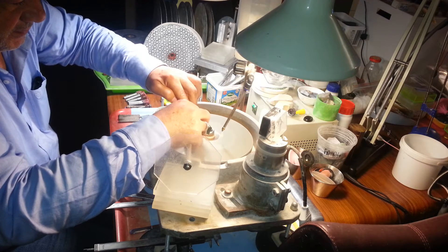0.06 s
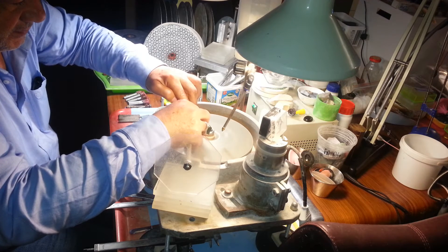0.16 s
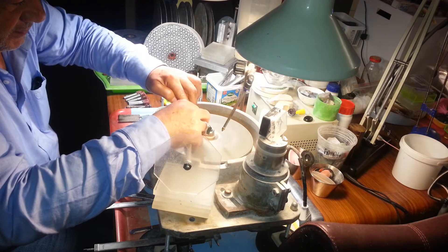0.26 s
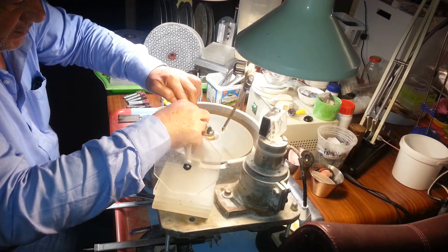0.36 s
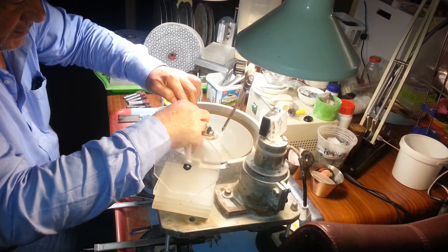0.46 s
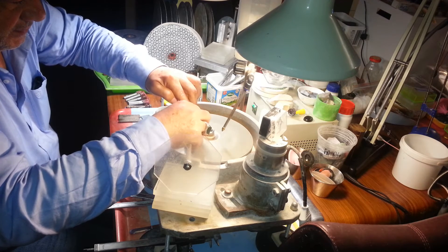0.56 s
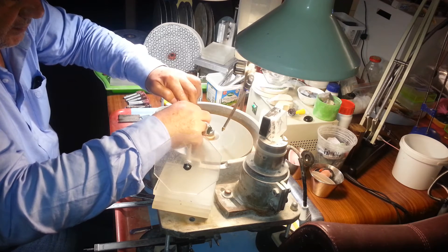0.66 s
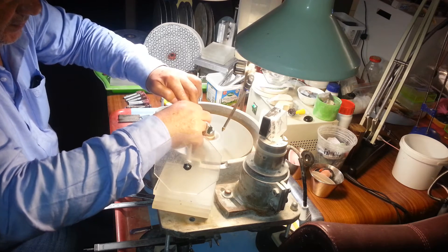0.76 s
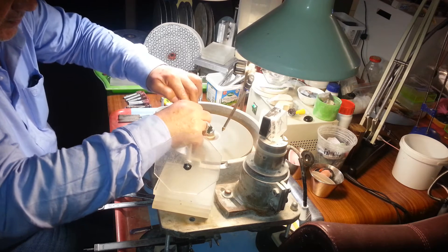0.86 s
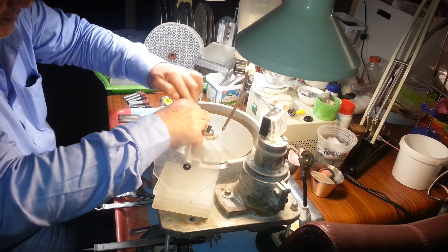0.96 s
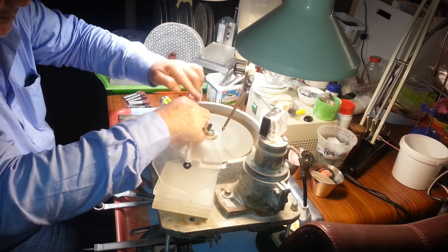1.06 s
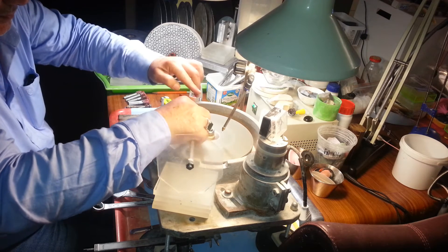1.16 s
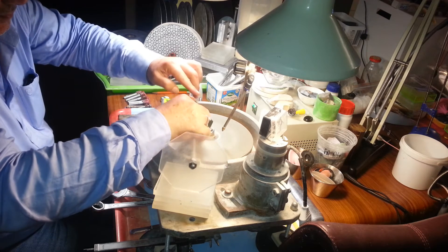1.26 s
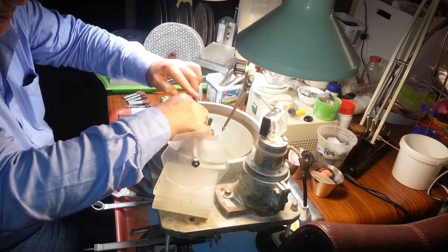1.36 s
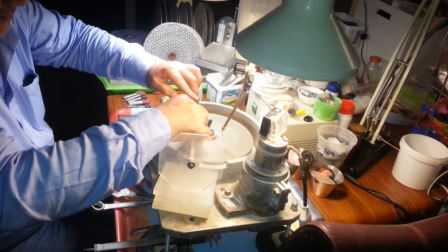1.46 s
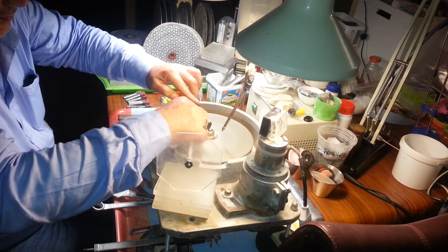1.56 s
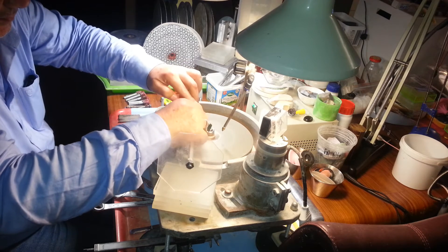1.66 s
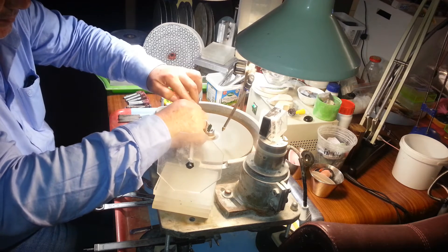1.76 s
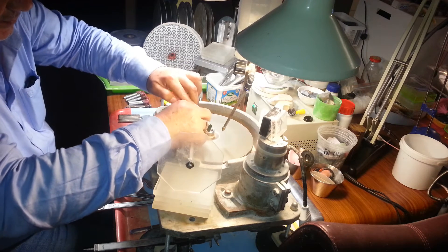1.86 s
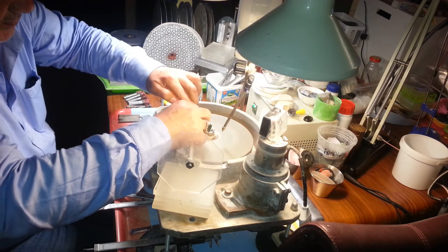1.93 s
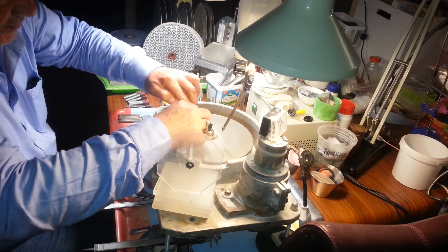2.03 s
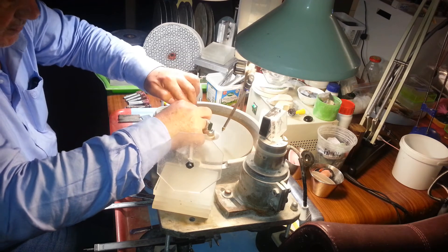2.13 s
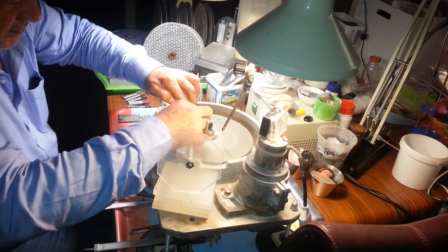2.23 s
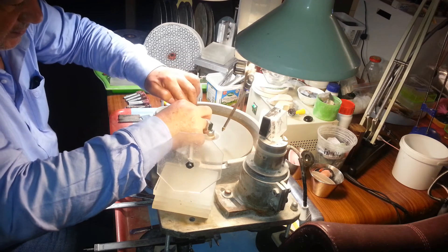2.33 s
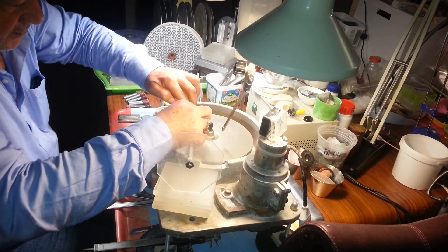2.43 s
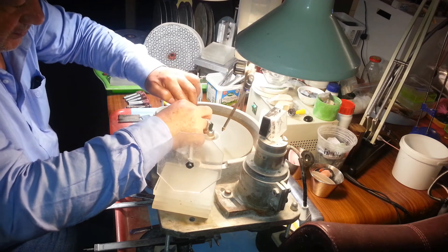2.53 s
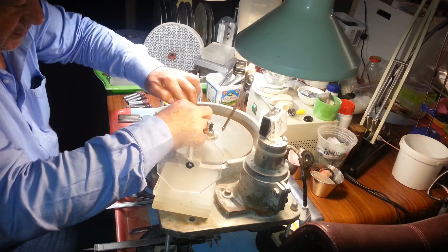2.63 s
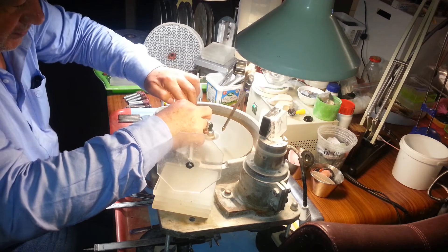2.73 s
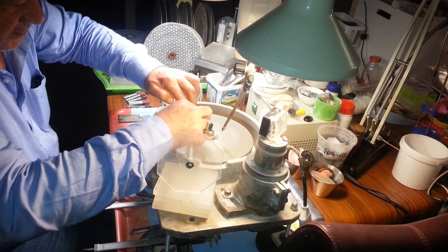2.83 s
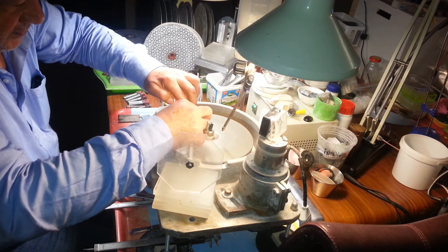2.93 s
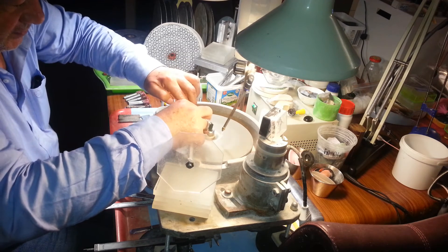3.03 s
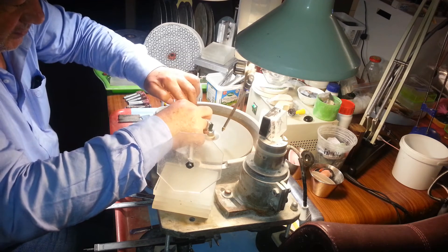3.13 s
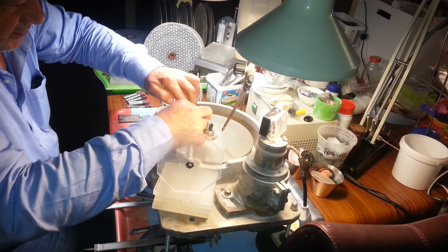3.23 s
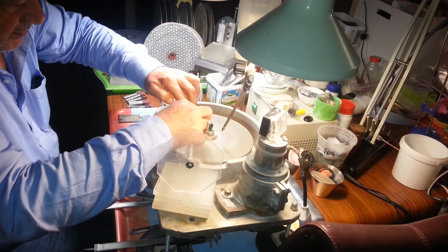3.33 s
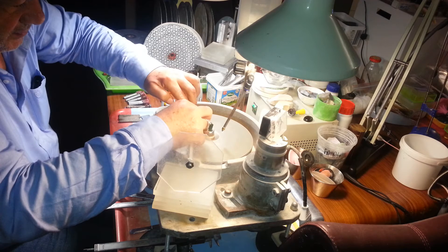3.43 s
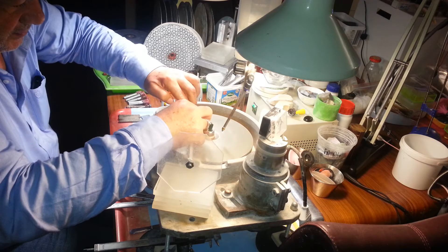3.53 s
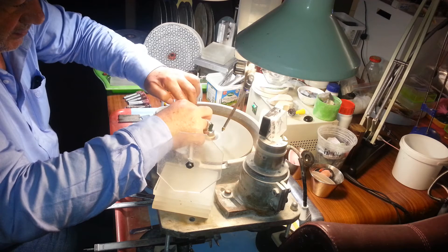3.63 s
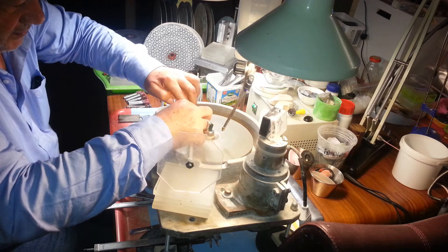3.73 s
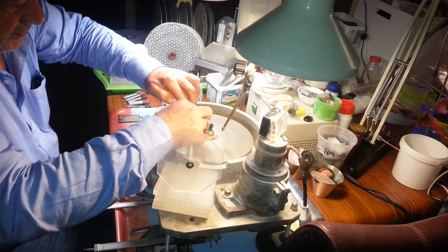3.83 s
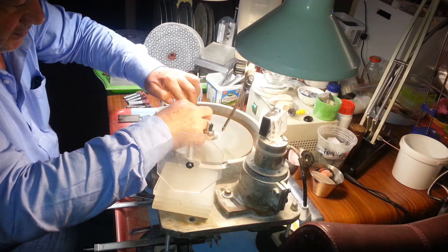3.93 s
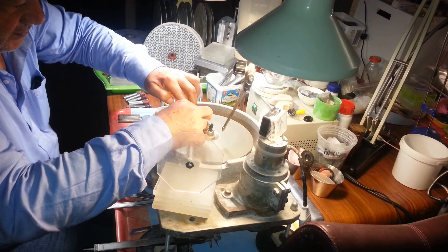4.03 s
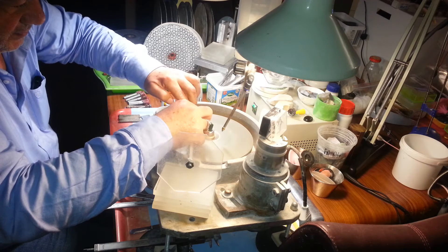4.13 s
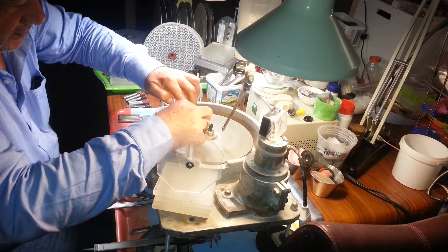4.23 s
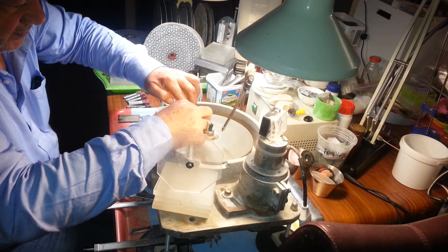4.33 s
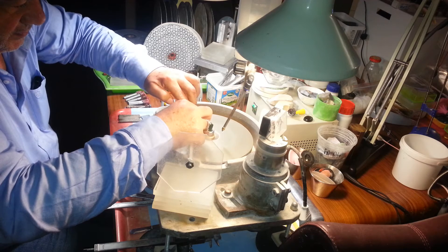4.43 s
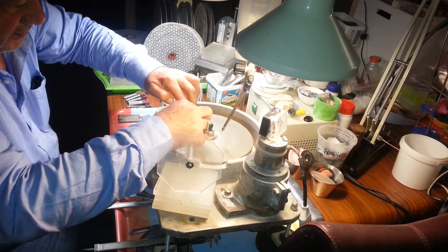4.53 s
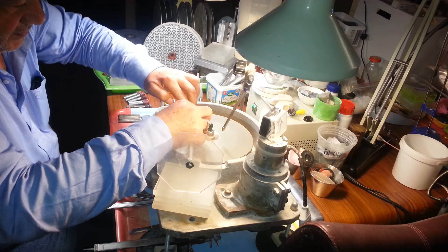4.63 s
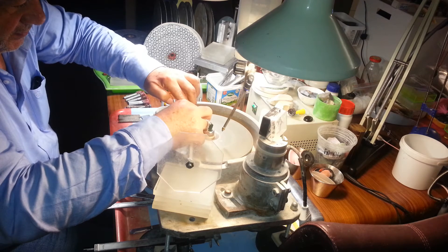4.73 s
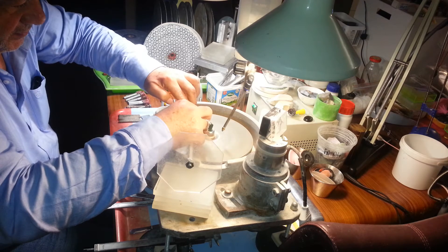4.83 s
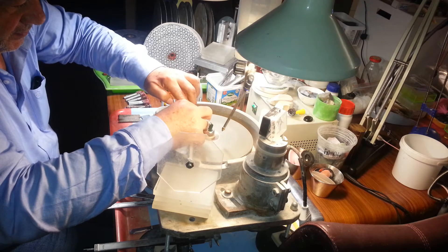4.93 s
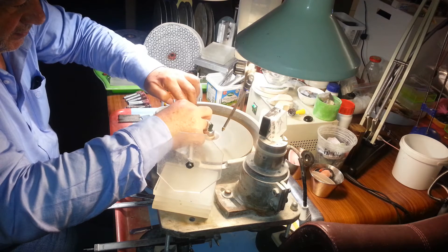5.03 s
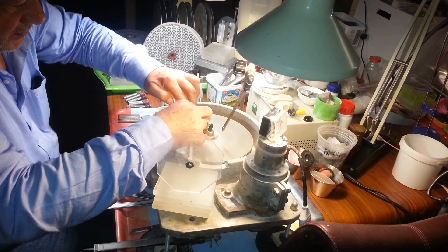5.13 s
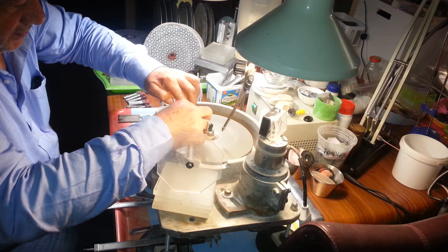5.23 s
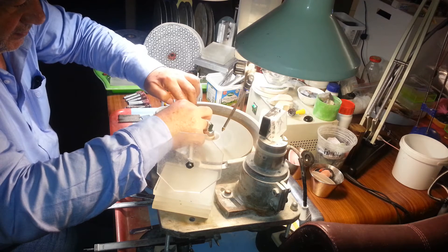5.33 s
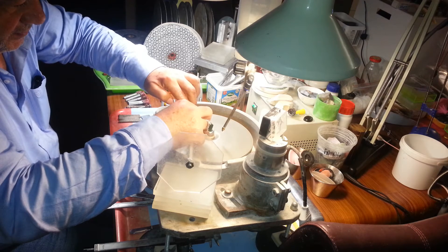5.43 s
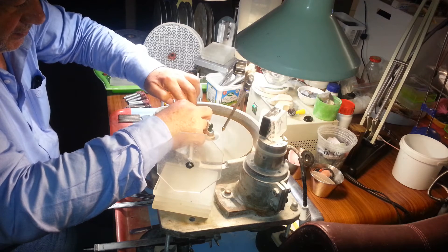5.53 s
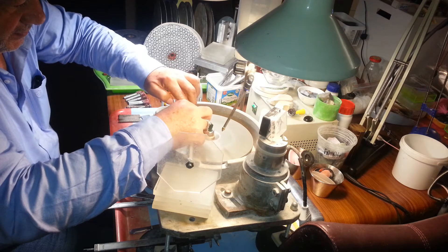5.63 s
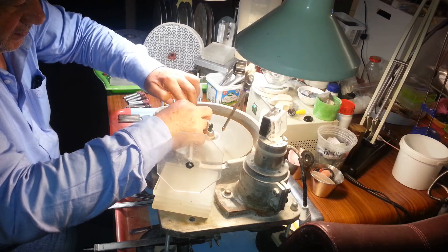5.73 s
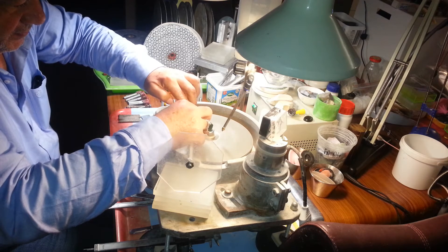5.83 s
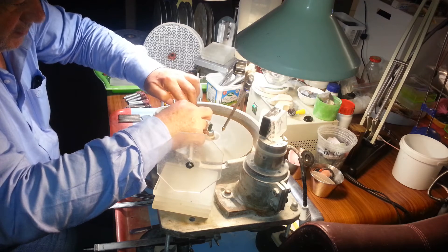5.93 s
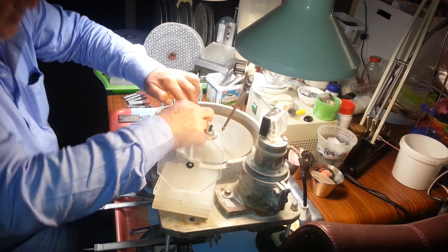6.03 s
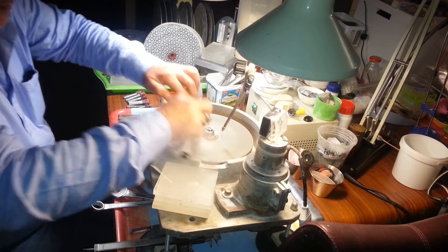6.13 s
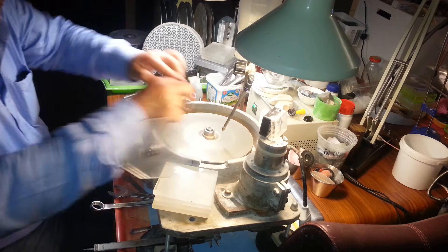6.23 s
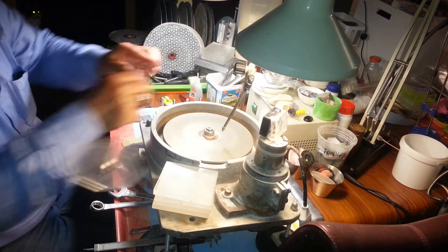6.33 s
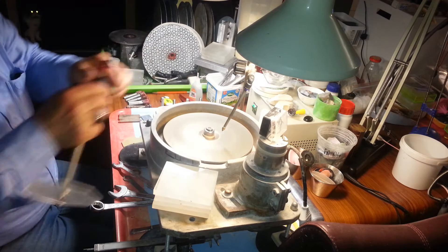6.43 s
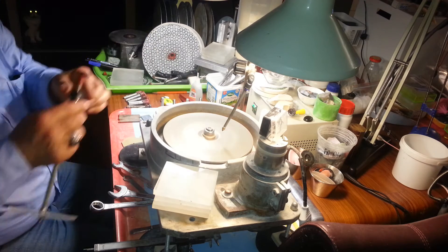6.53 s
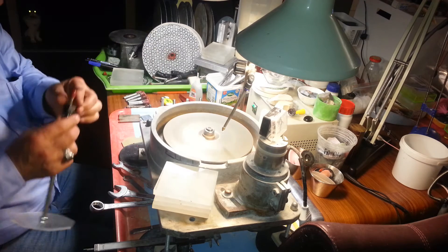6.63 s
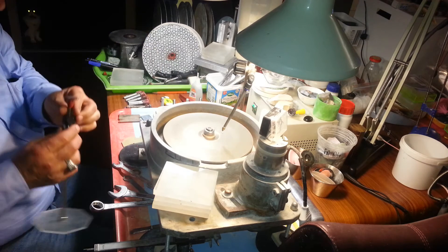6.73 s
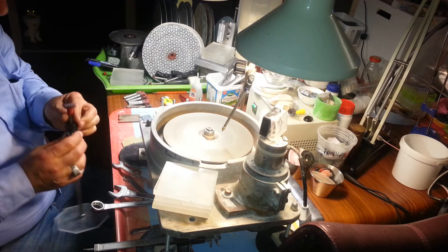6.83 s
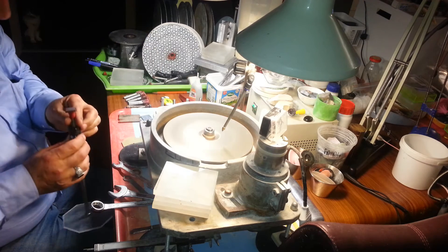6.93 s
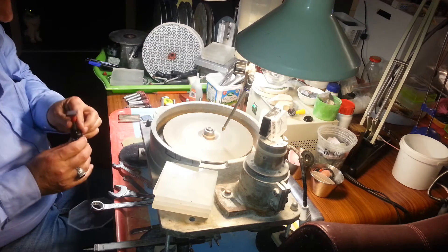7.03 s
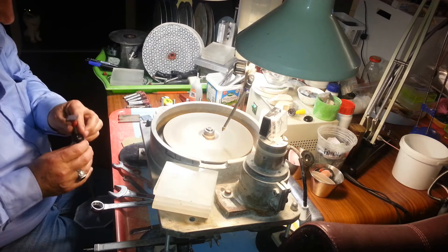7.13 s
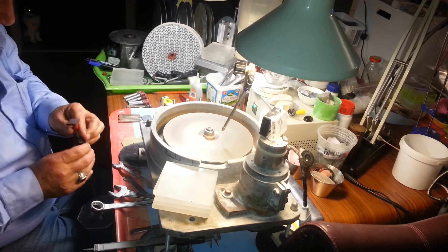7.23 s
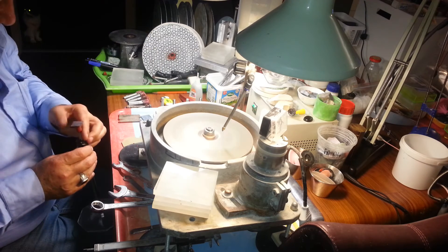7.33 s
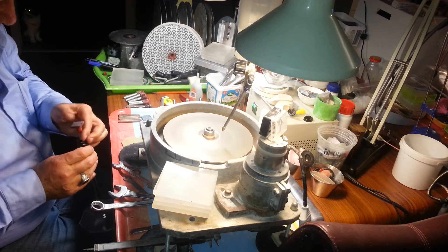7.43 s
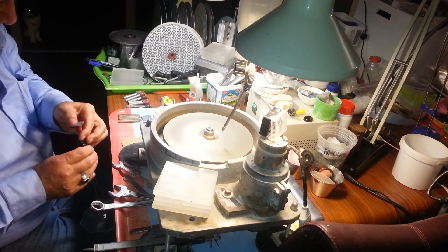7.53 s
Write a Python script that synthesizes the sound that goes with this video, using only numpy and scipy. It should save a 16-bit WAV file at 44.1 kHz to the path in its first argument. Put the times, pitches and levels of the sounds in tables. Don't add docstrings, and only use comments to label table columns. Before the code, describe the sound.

Sizzling, gritty treble dominates as a stone rubs on a spinning disc, with a low motor buzz pulsing beneath. A brief gap exposes hum and one clattering tap, then contact returns with a chirping scrape and continues for about four seconds. A final hard catch lifts the stone away, leaving the motor whirring freely. Close, dry indoor pickup, slightly choppy noise-gated texture and short room echo.

```python
import sys
import numpy as np
from scipy import signal
from scipy.fft import rfft, irfft, next_fast_len
from scipy.io import wavfile
from scipy.ndimage import uniform_filter1d, minimum_filter1d, map_coordinates

SR = 44100
rng = np.random.default_rng(int(sys.argv[2]) if len(sys.argv) > 2 else 0)


def put_to_file(sound):
    columns = np.atleast_2d(sound).T
    safe = np.clip(columns, -1, 1)
    whole_steps = np.round(safe * 32767)
    wavfile.write(sys.argv[1], SR, whole_steps.astype(np.int16))


def gain_from_db(level_db):
    decades = np.asarray(level_db, float) / 20
    return 10 ** decades


N = 333832
T = np.arange(N) / SR

# (time [s], scratch level [dB])
PRESSURE = [
    [(0.0, -29), (0.22, -29.5), (0.6, -30.5), (0.89, -32), (0.96, -34), (1.04, -36), (1.07, -33.5),
     (1.16, -67)],
    [(1.9372, -29.5), (2.03, -30), (2.07, -32.5), (2.3, -29.5), (2.8, -29.5), (4.3, -31), (6.16, -31.5),
     (6.225, -36.5), (6.32, -68.5)],
]
# (frequency [Hz], density [dB per Hz])
GRIT_COLOUR = [(3530, -42), (6000, -17), (6710, -8.5), (7170, 0), (7840, 1), (8970, -2.5), (10600, 0),
               (11800, -2.5), (14000, -4), (14600, -7.5)]
# (frequency [Hz], density [dB per Hz])
RING_COLOUR = [(2470, -32), (4200, -8.5), (4560, -2.5), (4930, -4.5), (5260, 1), (6690, -3), (7000, -3.5),
               (9100, -15), (15400, -120)]
# (frequency [Hz], width [Hz], level [dB])
RASP_MODES = [(1736.6, 180, 0), (2076.9, 41, 2), (2377, 92, -0.5), (2599.5, 173.5, 3), (2779, 70, 1),
              (3125, 160, -0.5), (3336, 62, 2), (3504, 63, 2.5), (3736, 140, 1), (4079, 96, 4),
              (4413, 200, -0.5)]
DISC_HZ = [4115, 4660, 5300, 6220, 7208, 7357, 7698, 7820, 8117, 8580, 8740, 8895, 9392, 9943, 10308, 10556,
           10980, 12118, 12330]
# (width [Hz], level over the hiss [dB])
DISC_SHAPES = [(42, 1.5), (120, 3), (200, -1.5), (160, 1.5), (50, -6), (70, -2), (30, -2.5), (60, 1),
               (28, 7), (50, -2.5), (50, 3.5), (24, 1.5), (90, 0.5), (90, 1), (70, -2.5), (50, -3),
               (100, 1.5), (50, 1.5), (90, -6)]
# (time [s], peak [dB], rise [s], time to fall 60 dB [s])
CATCHES = [
    (1.954, -23, 0.0042, 0.035),
    (2.1824, -31, 0.002, 0.017),
    (6.226, -25.5, 0.0055, 0.049),
    (6.233, -34, 0.002, 0.03),
]
# (time [s], dig level [dB], skip level [dB])
SKIPS = [
    (2.03, 0, -1.5),
    (2.18, 2, -1),
    (2.325, 1, -3),
    (6.162, -0.5, -4),
    (6.222, 7.5, -1),
]
# (frequency [Hz], width [Hz], level [dB])
SQUEAL_MODES = [(5887, 270, -1.5), (5204, 180, -3), (7800, 340, -2.5)]
# (valid from [s], time of one passage [s])
LOW_SPOTS = [
    (0.0, 0.5166),
    (1.5, 4.2),
]
# (time [s], peak [dB], brightest frequency [Hz], crack level [dB])
TAPS = [
    (1.3497, -23, 1900, 0),
    (1.3507, -27, 2000, -6),
    (1.3545, -26, 950, -30),
    (1.3589, -27, 3000, -14),
    (1.3612, -24, 800, -30),
]
# (frequency [Hz], level [dB], time to fall 60 dB [s])
HOLDER_MODES = [(420, -21, 0.044), (503, -8, 0.062), (615.6, -1, 0.08), (882, -9.5, 0.045),
                (1055.6, -3, 0.056), (1237, -5.5, 0.028), (1383, -3, 0.024), (1765, -6, 0.03238),
                (2186, 2, 0.0175), (2683, -8.5, 0.027), (3004, -10.5, 0.065), (3220, -7.5, 0.057),
                (3430, -4.5, 0.052), (4790, -14, 0.0155)]
# (frequency [Hz], width [Hz], level [dB])
HOUSING_MODES = [(217.4, 14, -1), (372, 43, 1), (519, 26, -3.5), (649.4, 95.7, 6), (834.3, 24, 6),
                 (910, 24, -0.5), (1050.2, 25.2, 5.5), (1135.2, 29, 1), (1232.8, 33, 2.5), (1402.2, 58, 7),
                 (1408, 34, -2), (1557, 98, 3)]
# (frequency [Hz], density [dB per Hz])
RUMBLE_COLOUR = [(24, -55), (40, -36), (54, -40), (157, -2), (226, -2), (346, -8), (488, 2.5), (736, -14.5),
                 (1040, 2), (1300, -1), (2400, -19.5), (3120, -48.5), (5280, -120)]
# (frequency [Hz], width [Hz], level [dB])
LOADED_PANEL = [(1437, 130, -12.5)]
# (frequency [Hz], density [dB per Hz])
BRUSH_COLOUR = [(1060, -11), (1800, -3.5), (2280, -2.5), (2590, -5), (2810, -4.5), (3200, -3), (3460, -7.5),
                (4260, 0), (4850, -10), (5250, -5), (6810, -5), (8400, -1), (14400, -17)]
# (frequency [Hz], width [Hz], level [dB])
BRUSH_MODES = [(4131, 56, 4.5), (4270, 60, -4), (5152, 130, 8.5), (3210, 83, -5)]
# (time [s], width [s], level change [dB])
BRUSH_DIPS = [(1.225, 0.0155, -2.5), (1.53, .02, -0.5), (1.745, .02, -3), (1.87, 0.019, -1.5),
              (6.43, 0.0156, -4), (6.735, 0.021, -3), (6.83, 0.0106, -1), (6.99, 0.031, -5),
              (7.265, 0.0152, -5), (7.545, 0.0205, -2)]
# (time [s], peak [dB])
BEARING_TICKS = [(1.2346, -41.5), (1.2984, -41), (1.484, -39.5), (1.6486, -47), (1.6741, -43),
                 (1.7743, -44.5), (6.3612, -46.5), (6.3861, -43.5), (6.4233, -36), (6.4615, -40),
                 (6.5718, -44.5), (6.6146, -46.5), (6.6356, -50), (6.673, -37.5), (6.7548, -41),
                 (6.7757, -39.5), (7.0556, -43.5), (7.1644, -29.5), (7.2911, -38.5)]
# (time [s], unloaded level [dB])
FREEDOM = [(0, -19.5), (1.05, -21.5), (1.15, 0.5), (1.95, -1), (2.1, -20.5), (6.2, -20.5), (6.3, 1),
           (7.57, 0)]
# (frequency [Hz], level [dB])
ROTOR_TONES = [(121, -66), (237, -60.5), (362, -65)]
# (time [s], width [s], level change [dB])
HUM_CHANGES = [(1.04, 0.057, -11.5), (1.176, 0.023, 4.5), (1.29, 0.042, -15.5), (1.7, 0.05, -1.5),
               (1.824, 0.019, 9.5), (1.95, 0.073, 0), (6.3, 0.026, -34.5), (6.436, 0.018, -15),
               (6.638, 0.0107, -13.5), (6.68, 0.0146, 9.5), (6.77, 0.057, -12.5), (6.86, 0.0182, 12),
               (7.45, 0.173, -6.5)]
# (time [s], frequency [Hz], level [dB])
BELT_TONE = [(0, 350, -73), (1.4, 350, -65), (1.7, 372, -50.5), (2.05, 415, -73), (2.3, 380, -57.5),
             (2.6, 345, -57), (3, 345, -63.5), (6.6, 345, -84.5), (6.95, 362, -50.5), (7.2, 395, -59.5),
             (7.57, 420, -65.5)]
# (time [s], level of the second multiple [dB])
BUZZ_LEVEL = [(0.0, -56.5), (0.45, -54.5), (0.95, -54), (1.15, -64), (1.95, -69.5), (2.05, -74.5),
              (2.3, -60.5), (2.75, -75.5), (3.2, -58.5), (3.8, -56.5), (5.5, -52.5), (6.22, -54.5),
              (6.37, -76.5), (7.57, -69)]
# (multiple of its base pitch [-], level [dB])
HIGH_BUZZ = [(4, -3.5), (5, -11), (6, -9)]
# (time [s], level [dB])
LOW_THROBS = [(0.74, -59), (0.89, -55), (0.97, -56), (2.092, -62), (2.368, -55.5), (2.746, -50.5),
              (3.179, -62), (3.478, -58.5), (3.563, -59.5), (3.819, -60.5), (4.286, -53), (4.354, -58),
              (4.697, -55), (4.866, -55.5), (4.929, -55), (5.015, -55), (5.186, -53), (5.333, -53),
              (5.485, -52.5), (5.568, -58.5), (5.633, -56.5), (5.801, -53.5), (5.889, -56), (5.955, -59),
              (6.126, -56)]
# (frequency [Hz], left minus right [dB])
PORTS = [(100, -1), (500, -2.5), (1200, 1), (2000, -4), (3000, -3.5), (4200, -6.5), (5300, -9),
         (6200, -3.5), (7000, 7), (8000, 13.5), (9300, 7.5), (10000, 8.5), (11000, 3), (14000, 3.5)]
# (frequency [Hz], likeness [0 to 1])
ALIKE = [(60, .3), (130, .8), (200, .65), (700, .62), (1400, .52), (3000, .25), (7000, .45), (11000, .42),
         (14000, .35)]
# (frequency [Hz], time to fall 60 dB [s])
ROOM_FADE = [(300, 0.31), (3000, 0.72), (12000, 0.25)]
# (frequency [Hz], threshold relative to the treble [dB])
PATCH_THRESHOLD = [(60, -17), (130, -15.5), (250, -12), (320, -14.5), (380, -16), (500, -34.5), (660, -13.5),
                   (800, -13.5), (960, -9.5), (1010, -23), (1150, -28), (1600, -17.5), (1900, -15), (3600, -16),
                   (5000, -17), (6200, -19), (7000, -35)]
# (frequency [Hz], threshold [dB])
TREBLE_FLOOR = [(11500, -95), (12300, -90), (12900, -85), (13400, -89), (13900, -88), (14300, -86),
                (14500, -82)]

BUZZ_HZ = 100.05
TURN_S = 0.307
LANDING_S = 1.94


def unit(x):
    return x / np.sqrt(np.mean(x ** 2) + 1e-20)


def along(points, hz):
    f, v = np.transpose(points)
    return np.interp(np.log(hz + 1), np.log(f + 1), v)


def curves(rows, outside=None):
    s, *columns = np.transpose(rows)
    return [np.interp(T, s, column, outside, outside) for column in columns]


def wobble(rate):
    return map_coordinates(rng.standard_normal(int(N * rate / SR) + 4), [T * rate])


def bump(s, width_s):
    return np.exp(-0.5 * ((T - s) / width_s) ** 2)


def fading(s, decay_s):
    return (T >= s) * np.exp(-np.maximum(T - s, 0) / decay_s)


def each_turn(late_s, width_s):
    (_, first), (change, second) = LOW_SPOTS
    passage = np.where(T < change, first, second)
    since = (T - passage - late_s + TURN_S / 2) % TURN_S - TURN_S / 2
    return np.exp(-0.5 * (since / width_s) ** 2)


def filtered(x, response):
    m = next_fast_len(N + SR // 2)
    return irfft(rfft(x, m) * response(np.fft.rfftfreq(m, 1 / SR)), m)[..., :N]


def peaks(modes, hz):
    return np.sqrt(sum(gain_from_db(2 * db) / (1 + (2 * (hz - c) / w) ** 2) for c, w, db in modes))


def rush(gain, grain_db=0.0, lag=0.0, patchy_db=0.0):
    z = signal.stft(rng.standard_normal((2, N)) * gain_from_db(grain_db * wobble(900)), nperseg=1024)[2]
    patches = uniform_filter1d(rng.standard_normal(z.shape[1:]), size=3, axis=0)
    patches = uniform_filter1d(patches, size=4, axis=1)
    pair = signal.istft(z * gain_from_db(patchy_db * unit(patches)), nperseg=1024)[1][:, :N]

    def spread(hz):
        angle = np.arccos(np.clip(along(ALIKE, hz), 0, 1)) / 2
        return gain(hz) * np.array([np.cos(angle), np.sin(angle)])

    def share(hz):
        lean = gain_from_db(along(PORTS, hz))
        left = lean * np.exp(-2j * np.pi * hz * lag / SR)
        return np.sqrt(2 / (1 + lean ** 2)) * np.array([left, np.ones_like(hz)])

    mid, side = filtered(pair, spread)
    return unit(filtered(np.array([mid + side, mid - side]), share))


def tone(hz, blur):
    phase = 2 * np.pi * np.cumsum(hz + 0 * T) / SR + blur * wobble(12)
    port_drift = 0.662 * np.array([wobble(5.2), wobble(4.8)])
    return np.sqrt(2) * np.sin(phase + port_drift) * gain_from_db(2.116 * blur * wobble(14))


def shop(x):
    hz, t, z = signal.stft(rng.standard_normal((2, SR // 2)), SR, nperseg=256)
    tail = signal.istft(z * gain_from_db(-60 * t / along(ROOM_FADE, hz)[:, None]), SR, nperseg=256)[1]
    late = np.pad(x, ((0, 0), (300, 0)))
    return signal.fftconvolve(late, tail / np.linalg.norm(tail[0]), axes=1)[:, :N]


def load_buzz():
    unsteady_hz = 9
    pull_db = curves(BUZZ_LEVEL)[0] + 2.5 * wobble(26)
    pull_db += -13.5 * each_turn(0.0, 0.0252) + 0.76 * each_turn(0.067, 0.03)
    pull_db += -2.66 * each_turn(0.16, 0.019) + 1.0 * each_turn(0.16, 0.026)
    second_hz = 2 * BUZZ_HZ + 2 + unsteady_hz * wobble(28)
    third_hz = 3 * BUZZ_HZ + 0.4536 * unsteady_hz * wobble(28)
    third_db = -4.5 + 0.62 * T + 1.48 * wobble(7.6)
    buzz = gain_from_db(1.8 * wobble(30) - 1.0) * tone(second_hz, blur=0.55)
    buzz = buzz + gain_from_db(third_db) * tone(third_hz, blur=0.73)
    buzz += sum(gain_from_db(db) * tone(k * BUZZ_HZ, blur=0.967) for k, db in HIGH_BUZZ)
    return gain_from_db(pull_db + 0.5) * buzz


def low_throbs():
    late_s, width_s = 0.02, 0.0141
    strength = sum(gain_from_db(db) * bump(s + late_s, width_s) for s, db in LOW_THROBS)
    return strength * tone(104.85, blur=0.43)


def unloaded():
    return gain_from_db(curves(FREEDOM)[0])


def hum_change():
    return sum(db * bump(s, width_s) for s, width_s, db in HUM_CHANGES)


def housing(rattle):
    jolt_db, jolt_s = 6, 0.38
    level_db = -48 - 1.2 * each_turn(0.07, 0.04) + 0.15 * hum_change() + 0.6 * wobble(11)
    rumble = rush(lambda hz: gain_from_db(along(RUMBLE_COLOUR, hz)) * (0.23 + peaks(HOUSING_MODES, hz)),
                  grain_db=1.0, patchy_db=1.5)
    jolt = (gain_from_db(jolt_db * fading(LANDING_S, jolt_s)) - 1) * filtered(rumble, lambda hz: hz > 450)
    run_up = gain_from_db(2.5) / (1 + np.exp((7.205 - T) / 0.176))
    singing = run_up * filtered(rumble, lambda hz: peaks([(1097, 146, 0)], hz) ** 2)
    quieter = unloaded() * filtered(rumble, lambda hz: peaks(LOADED_PANEL, hz))
    return gain_from_db(level_db + 3.5) * rattle * (rumble + jolt + singing - quieter)


def brushes(rattle):
    level_db = -50.5 + 6 * fading(LANDING_S, 0.19) + 0.6 * wobble(40)
    level_db += sum(db * bump(s, width_s) for s, width_s, db in BRUSH_DIPS)
    ticks = sum(gain_from_db(db - 9.0) * fading(s, 0.0304 / np.log(1000)) for s, db in BEARING_TICKS)
    sparks = 1 + 0.28 * (0.5 + 0.5 * np.cos(2 * np.pi * BUZZ_HZ * T)) ** 8
    hiss = rush(lambda hz: gain_from_db(along(BRUSH_COLOUR, hz)) * (1 + 0.62 * peaks(BRUSH_MODES, hz)),
                grain_db=1.5, lag=3.145, patchy_db=1.32)
    return (gain_from_db(level_db + 6.5) + ticks) * unit(sparks * rattle * hiss)


def rotor_and_belt():
    free = unloaded()
    rotor = free * sum(gain_from_db(db) * tone(hz, blur=2.1) for hz, db in ROTOR_TONES)
    hum_db = -56.5 + 3.5 * free + hum_change() + 2.0 * wobble(20)
    hum_hz = 483 - 0.5 * curves(FREEDOM)[0] + 12 * wobble(22)
    hum = gain_from_db(hum_db + 0.5) * tone(hum_hz, blur=1.207)
    belt_hz, belt_db = curves(BELT_TONE)
    belt = gain_from_db(belt_db - 1.5 + 2.02 * wobble(15)) * tone(belt_hz, blur=1.36)
    return rotor + hum + belt


def motor():
    rattle = gain_from_db(0.94 * wobble(35))
    return housing(rattle) + brushes(rattle) + rotor_and_belt()


def knock():
    spread_db = -2.5
    out, t = np.zeros(N), np.arange(SR // 5) / SR
    for s, db, bright_hz, crack_db in TAPS:
        ring = np.zeros(len(t))
        for hz, level, t60 in HOLDER_MODES:
            mode_db = level + spread_db * np.log2(hz / bright_hz) ** 2 + rng.normal(0, 2.58)
            ring -= gain_from_db(mode_db - 60 * t / t60) * np.sin(2 * np.pi * hz * t)
        grains = np.diff(rng.standard_normal(len(t) + 1))
        crack = gain_from_db(crack_db - 60 * t / 0.0103) * np.convolve(grains, np.hanning(10) / 2, "same")
        out[round(s * SR):][:len(t)] += gain_from_db(db - 3.5) * (ring + crack)
    small = lambda hz: (1j * hz / (530 + 1j * hz)) ** 2
    return filtered(out, small) * gain_from_db([[0.8], [-0.8]])


def disc_gain(hz):
    return 1 + 1.02 * peaks([(c, *shape) for c, shape in zip(DISC_HZ, DISC_SHAPES)], hz)


def scratch():
    return rush(lambda hz: gain_from_db(along(GRIT_COLOUR, hz)) * disc_gain(hz),
                grain_db=1.0544, lag=-0.965, patchy_db=1.5)


def disc_ring(light_db):
    level_db = -10 + np.minimum(0.4 * light_db, 8.9)
    level_db += 4 * fading(LANDING_S, 1) + 4.5 * bump(LANDING_S + 0.029, 0.013)
    level_db += 6.5 * bump(1.07, 0.0143)
    level_db += -1.74 * each_turn(0.0, 0.0185) + 2.38 * each_turn(0.0378, 0.0191)
    ring = rush(lambda hz: gain_from_db(along(RING_COLOUR, hz)) * disc_gain(hz),
                grain_db=0.5, lag=-1.87, patchy_db=3.0)
    return gain_from_db(level_db) * ring


def rasp(light_db):
    level_db = -18.5 + np.minimum(0.61 * light_db, 8.9)
    level_db += 9.5 * fading(LANDING_S, 0.102) + 1.3 * wobble(16)
    chatter = rush(lambda hz: peaks(RASP_MODES, hz) ** 2, grain_db=1.5, patchy_db=3.5)
    return gain_from_db(level_db - 2.5) * chatter


def catches():
    strength = gain_from_db(-17) * fading(1.9369, 0.006 / np.log(1000))
    for s, db, rise_s, t60 in CATCHES:
        fall = gain_from_db(db - 5.5 - 60 * np.maximum(T - s, 0) / t60)
        strength += fall * np.where(T < s, bump(s, rise_s), 1)
    colour = [(900, -39), (1800, 6.0), (6000, 5), (14000, 0)]  # (frequency [Hz], density [dB per Hz])
    return strength * rush(lambda hz: gain_from_db(along(colour, hz)))


def squeal():
    start_s = 1.951
    strength = fading(start_s, 0.038) + 0.45 * (T > 1.942) * (T < start_s)
    first = gain_from_db(-22) * strength * rush(lambda hz: peaks(SQUEAL_MODES, hz) ** 2, lag=-1.67)
    again = rush(lambda hz: peaks([(8000, 350, 0)], hz) ** 2, lag=-1.54)
    return first + gain_from_db(-25) * bump(2, 0.0019) * again


def grind():
    firm_db = -30
    dig_s, skip_after_s = 0.0195, 0.0374
    press_db = np.max([curves(rows, outside=-120)[0] for rows in PRESSURE], axis=0)
    light_db = firm_db - np.minimum(press_db, firm_db)
    flutter_db = 0.62 * wobble(25)
    bite_db = 0.9 * each_turn(0.0069, 0.023) + 0.68 * each_turn(0.1, 0.028)
    for s, dig_db, skip_db in SKIPS:
        bite_db += dig_db * bump(s, dig_s) + skip_db * bump(s + skip_after_s, dig_s)
    rubbing = scratch() + disc_ring(light_db) + rasp(light_db)
    return gain_from_db(press_db + 2.5 + flutter_db + bite_db) * rubbing + squeal() + catches()


def scene():
    tap, stone = knock(), grind()
    background = load_buzz() + low_throbs() + motor()
    return background + tap + gain_from_db(-7.5) * shop(tap) + stone + gain_from_db(-8.5) * shop(stone)


def drop_faint_patches(x):
    hz, t, z = signal.stft(x, SR, nperseg=2048)
    power = np.abs(z) ** 2
    treble = power[:, (hz > 6500) & (hz < 14500)].mean(axis=(0, 1))
    treble = minimum_filter1d(treble, size=5)
    patch = uniform_filter1d(power.mean(axis=0), size=3, axis=0)
    doubt = uniform_filter1d(rng.standard_normal(patch.shape), size=6, axis=0)
    doubt_db = 2.5 * unit(uniform_filter1d(doubt, size=2, axis=1))
    heard = patch > gain_from_db(2 * (along(PATCH_THRESHOLD, hz)[:, None] + doubt_db)) * treble
    wide_patch = uniform_filter1d(patch, size=9, axis=0)
    heard &= wide_patch > gain_from_db(2 * (along(TREBLE_FLOOR, hz)[:, None] + doubt_db))
    return signal.istft(z * heard, SR, nperseg=2048)[1][:, :N]


def top_cut(x):
    return signal.sosfilt(signal.butter(12, 15850, fs=SR, output="sos"), x)


def record(dry):
    heard = filtered(dry, lambda hz: (hz < 14620) * hz ** 2 / (hz ** 2 + 55 ** 2))
    return top_cut(drop_faint_patches(heard))


dry = scene()
out = record(dry)
put_to_file(out)
```